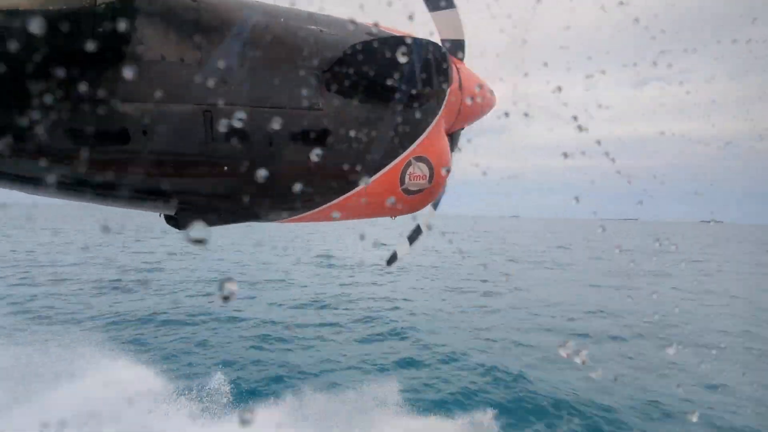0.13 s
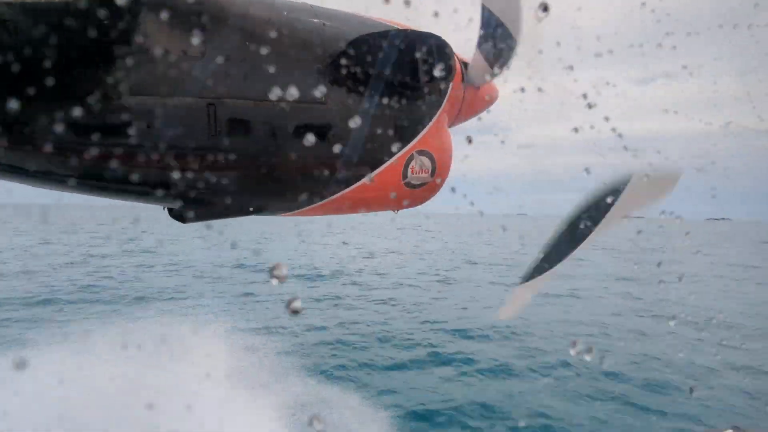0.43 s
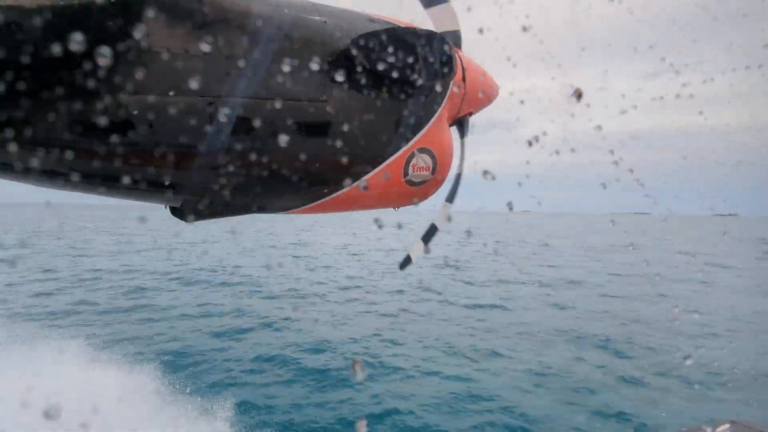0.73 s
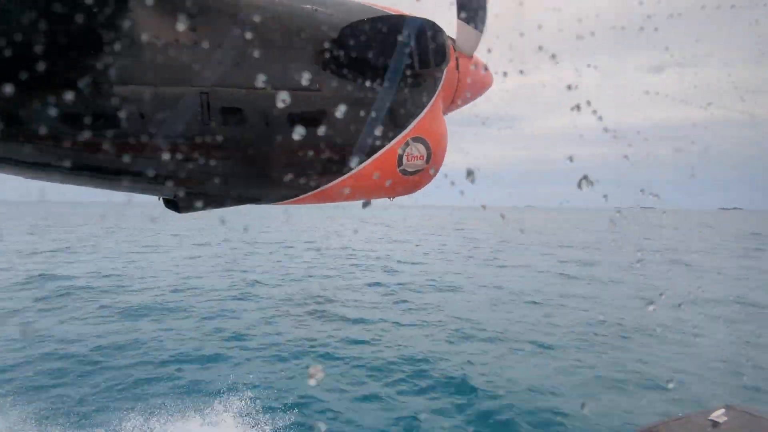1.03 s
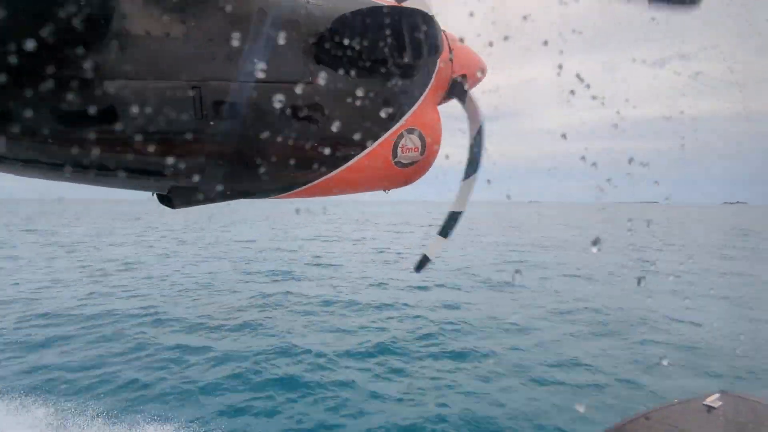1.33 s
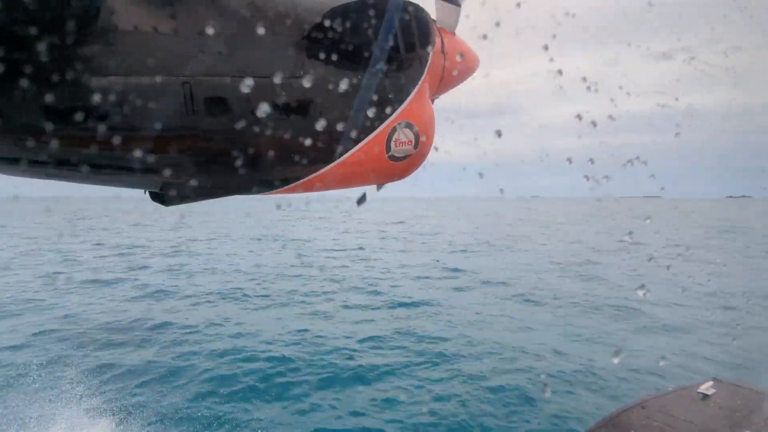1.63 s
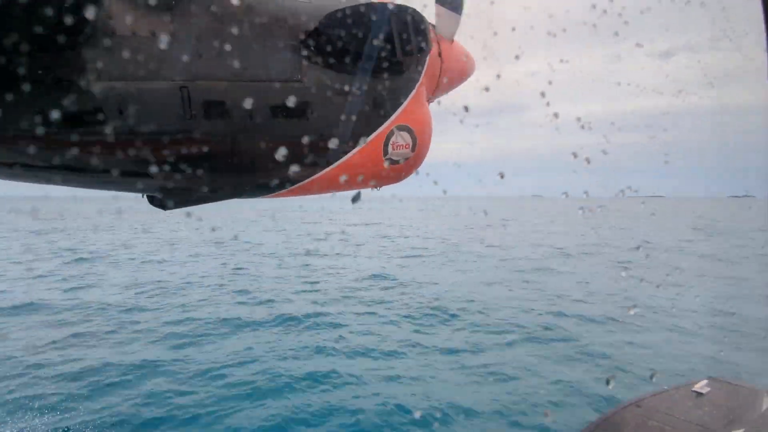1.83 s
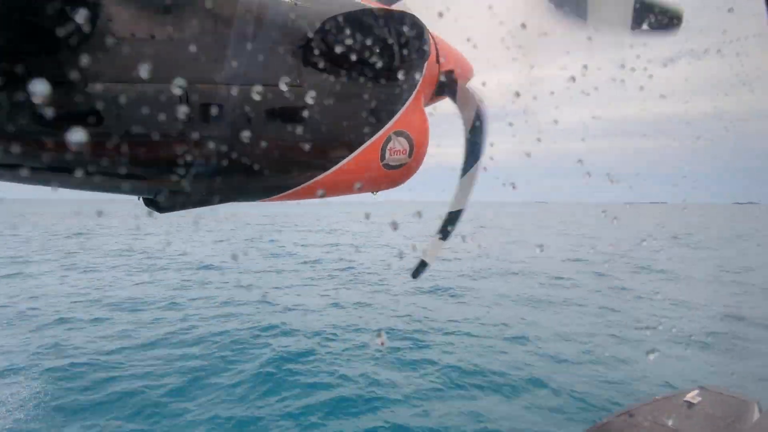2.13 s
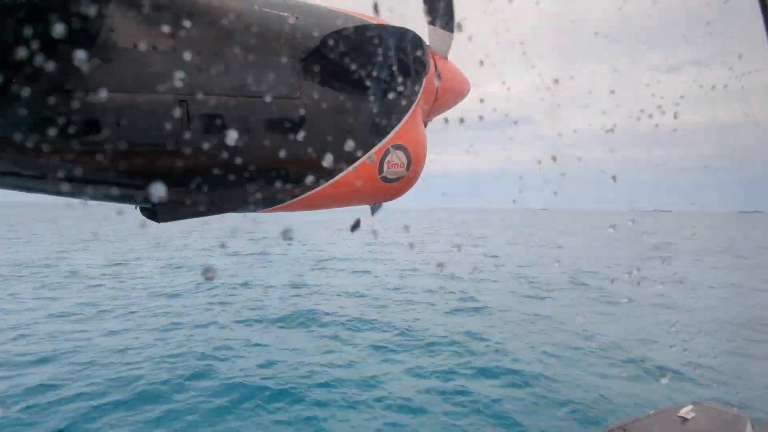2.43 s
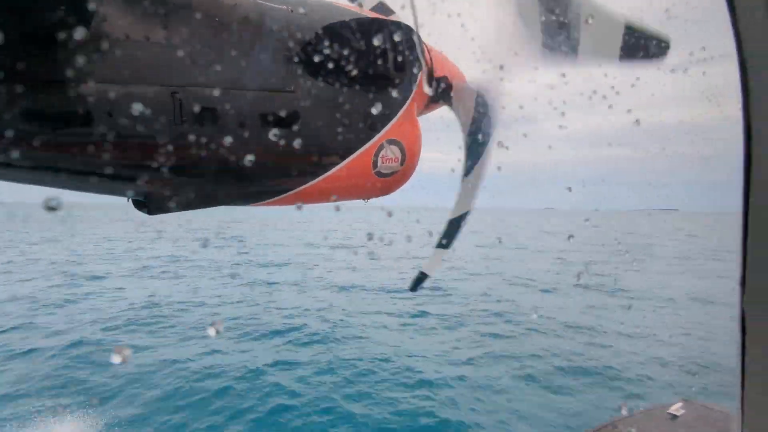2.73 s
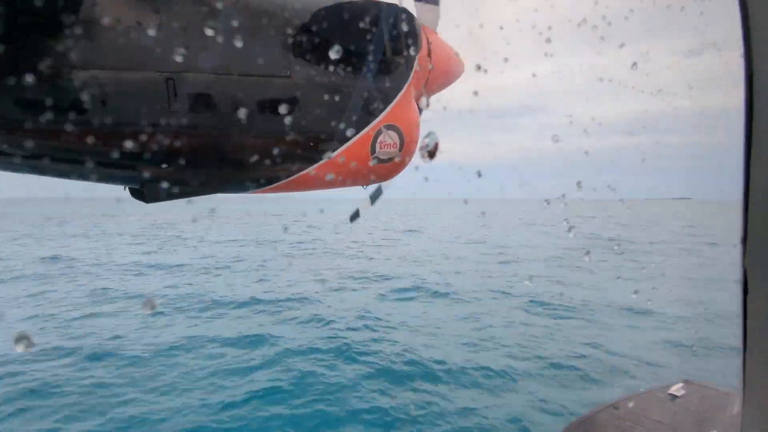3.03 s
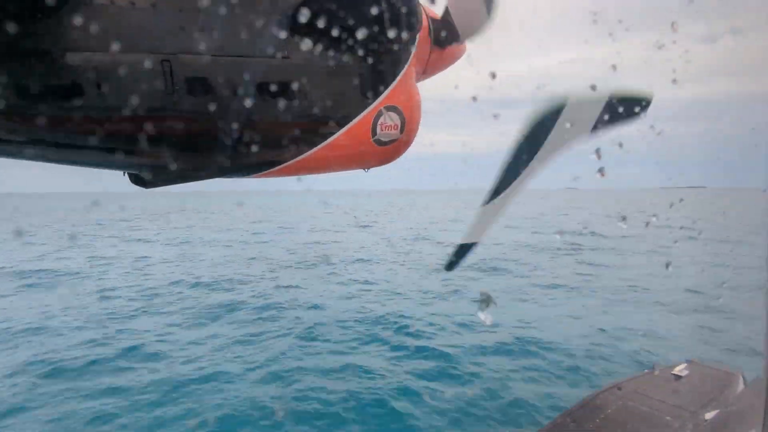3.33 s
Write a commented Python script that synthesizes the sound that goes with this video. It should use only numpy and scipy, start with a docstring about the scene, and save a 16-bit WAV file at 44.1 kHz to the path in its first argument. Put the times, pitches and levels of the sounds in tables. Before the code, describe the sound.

Loud, deep turboprop propeller drone heard inside a small seaplane cabin, steady and throbbing

```python
"""Seaplane cabin at takeoff

Stereo microphones at a window seat of a twin-turboprop seaplane lifting off the water at full power.
The near and far propellers turn at almost the same speed, so each harmonic beats at its own pace.
Noise shaped in frequency gives the rush of slipstream and exhaust through the cabin wall.
Narrow bands of noise give the faint shaft overtones, gear tones and turbine hiss."""
import sys
import numpy as np
from scipy import signal
from scipy.fft import rfft, irfft
from scipy.io import wavfile

SR = 44100
rng = np.random.default_rng(int(sys.argv[2]) if len(sys.argv) > 2 else 0)


def dump_mix(stems):
    """Bounce the given channels to the path in sys.argv[1] as a 16-bit WAV at rate SR."""
    frames = np.atleast_2d(stems).T  # one column per channel
    limited = np.clip(frames, -1, 1)  # hard clip at full scale
    pcm = np.round(limited * 32767).astype(np.int16)
    wavfile.write(sys.argv[1], SR, pcm)


N = 153468
TIME = np.arange(N) / SR
FREQS = np.maximum(np.fft.rfftfreq(N, 1 / SR), 1)


def from_db(db):
    """Decibels to gain."""
    return 10 ** (np.asarray(db) / 20)


def rms_one(x):
    """Scale to unit power."""
    return x / np.sqrt(np.mean(x ** 2) + 1e-20)


def in_time(rows):
    """The columns of a curve at every sample."""
    seconds, *columns = np.transpose(rows)
    return [np.interp(TIME, seconds, column) for column in columns]


def in_frequency(rows):
    """The columns of a spectrum at every frequency, joined along a log frequency axis."""
    hz, *columns = np.transpose(rows)
    return np.array([np.interp(np.log(FREQS), np.log(hz), column) for column in columns])


def apart(difference):
    """Split a left-right difference evenly: half added at left, half taken away at right."""
    return np.array([[.5], [-.5]]) * difference


def drift(corner_hz):
    """Slow random motion with spread 1: noise through two equal low-pass poles."""
    step = 40   # samples between computed points
    pole = np.exp(-2 * np.pi * corner_hz * step / SR)
    noise = rng.standard_normal(N // step + 2002)
    slow = signal.lfilter([1], [1, -2 * pole, pole * pole], noise)[2000:]   # start-up dropped
    return np.interp(np.arange(N) / step, np.arange(len(slow)), rms_one(slow))


# blade-pass rate: (time [s], near propeller [Hz], far propeller [Hz])
BLADE_RATE = [(0.0, 104.673, 104.087), (0.3, 104.761, 104.489), (0.6, 104.796, 104.142),
              (0.9, 104.81, 104.357), (1.2, 104.891, 104.384), (1.5, 104.964, 104.367),
              (1.8, 104.94, 104.407), (2.1, 104.747, 104.5), (2.4, 104.769, 104.479),
              (2.75, 104.881, 104.531), (3.1, 105.086, 104.761), (3.48, 104.823, 104.54)]


def blade_angles():
    """Running phase of the near and far blade pulses [rad], the sum of their rates."""
    return [2 * np.pi * np.cumsum(hz) / SR for hz in in_time(BLADE_RATE)]


# drone in the cabin, before the level curves: (multiple of the blade rate, near level [dB], far level [dB],
# a cancellation at left [s], at right [s], left-right difference [dB], left lead over right [rad])
HARMONICS = [(1.0, -24.68, -18.53, 0.82, 0.98, 0.06, 0.0), (2.0, -16.7, -17.35, 0.77, 0.77, 2.13, 0.0),
             (3.0, -24.6, -21.0, 0.54, 0.53, 2.0, 0.0), (4.0, -22.29, -32.7, 0.2, 0.21, 3.75, 0.0),
             (5.0, -29.78, -39.27, 0.32, 0.41, 6.06, 0.8), (6.0, -46.07, -39.21, 0.45, 0.19, 10.58, 1.6),
             (7.0, -41.31, -52.03, 0.38, 0.19, 6.76, 1.2), (8.0, -46.92, -54.97, 0.1, 0.07, 10.71, -1.1),
             (9.0, -50.92, -60.66, 0.08, 0.36, 4.05, -0.7), (10.0, -51.46, -59.73, 0.28, 0.2, 2.78, 2.0)]
# swell of the fundamental: (time [s], level [dB])
FUNDAMENTAL_LEVEL = [(0, 0), (.2, 1.8), (.7, -1), (1.1, -1.5), (1.7, -.3), (2.15, 1.5), (2.8, -1.3),
                     (3.48, 4)]
# swell of the second harmonic: (time [s], level [dB])
SECOND_LEVEL = [(0.0, -2.72), (0.3, -3.33), (0.6, -2.59), (0.9, 3.56), (1.3, 0.85), (1.7, 1.17),
                (2.1, 0.63), (2.7, 0.12), (3.48, 3.13)]
# swell of the harmonics above it: (time [s], level [dB])
UPPER_LEVEL = [(0.0, 0.35), (0.2, 3.35), (0.55, -1.81), (1.0, 1.88), (1.6, -1.63), (2.1, -0.27),
               (2.6, -3.96), (3.05, -1.29), (3.48, 0.78)]
# the fuselage spreads each suction pulse of a blade: the lag grows with the square of the multiple
SMEAR_RAD = 1.43
WOBBLE_RAD, WOBBLE_HZ = 0.06, 9.4   # turbulence shifts the timing of the blade pulses
FLUTTER_DB_PER_MULTIPLE, FLUTTER_HZ = 0.3018, 11.7   # and shakes their strength, most in high harmonics
WAVER_DB, WAVER_HZ = 0.87, 4.7   # each harmonic wavers a little as a whole


def propellers(near, far):
    """Two sets of blade harmonics that beat as one propeller slips past the other."""
    first_db, = in_time(FUNDAMENTAL_LEVEL)
    second_db, = in_time(SECOND_LEVEL)
    upper_db, = in_time(UPPER_LEVEL)
    wobble = WOBBLE_RAD * drift(WOBBLE_HZ)
    drone = 0
    for k, near_db, far_db, left_s, right_s, pan_db, lead in HARMONICS:
        offset = k * wobble + apart(lead) - SMEAR_RAD * k * k
        # line the far wave up with the near one at the listed moment, where their difference cancels
        slip = np.interp([[left_s], [right_s]], TIME, near - far)
        flutter_db = FLUTTER_DB_PER_MULTIPLE * k
        near_gain = from_db(near_db + flutter_db * drift(FLUTTER_HZ))
        far_gain = from_db(far_db + flutter_db * drift(FLUTTER_HZ))
        near_wave = near_gain * np.cos(k * near + offset)
        far_wave = far_gain * np.cos(k * (far + slip) + offset)
        swell_db = first_db if k == 1 else second_db if k == 2 else upper_db
        gain = from_db(apart(pan_db) + swell_db + WAVER_DB * drift(WAVER_HZ))
        # sqrt(2) turns RMS levels into peaks; the minus makes it a suction pulse
        drone = drone - np.sqrt(2) * gain * (near_wave - far_wave)
    return drone


# slipstream and exhaust through the cabin wall, before the trim and level curve:
# (frequency [Hz], left density [dB per Hz], right density [dB per Hz])
RUSH = [(25.0, -74.6, -73.7), (42.0, -68.2, -68.6), (65.0, -56.9, -57.8), (135.0, -54.9, -56.4),
        (250.0, -54.0, -55.3), (400.0, -58.5, -61.7), (560.0, -60.7, -65.6), (800.0, -64.9, -70.8),
        (1150.0, -64.3, -69.1), (1400.0, -68.6, -69.6), (2100.0, -77.7, -70.2), (2750.0, -79.2, -73.3),
        (3150.0, -82.2, -79.8), (4400.0, -87.8, -79.1), (5400.0, -91.5, -81.6), (6300.0, -86.7, -81.1),
        (7200.0, -86.9, -87.4), (8050.0, -91.9, -92.0), (8900.0, -86.3, -89.1), (10900.0, -85.6, -87.9),
        (12000.0, -85.5, -86.6), (13200.0, -94.0, -94.6), (15400.0, -97.4, -97.7)]
# left-right likeness of the noise: (frequency [Hz], likeness [-1 opposite to 1 identical])
LIKENESS = [(35, -0.4), (70, 0.82), (240, 1), (370, 0.88), (560, 0.29), (830, 0.14), (1200, -0.37),
            (1800, -0.13), (3000, 0.1)]
RUSH_TRIM_DB, RUSH_FLICKER_DB, RUSH_FLICKER_HZ = -0.5, 0.55, 8.0
BLADE_CHOP = 0.05   # share of the rush that pulses with the blades


def rush(blade_angle):
    """Broad noise, mostly alike left and right in the bass; octaves flicker and the blades chop it."""
    mid, side = rfft(rng.standard_normal((2, N)))
    alike = np.clip(in_frequency(LIKENESS), -1, 1)
    # 2.1 rather than 2 widens the stereo image slightly
    stereo = np.sqrt(1 + alike) * mid + np.sqrt(1 - alike) * side * apart(2.1)
    density = from_db(in_frequency(RUSH) + RUSH_TRIM_DB)
    spectrum = stereo * density * np.sqrt(SR) / 2
    octave = np.clip(np.round(np.log2(FREQS)), 6, 13)
    noise = 0
    for k in np.unique(octave):
        band = irfft(spectrum * (octave == k), N)
        noise = noise + band * from_db(RUSH_FLICKER_DB * drift(RUSH_FLICKER_HZ))
    return noise * (1 + BLADE_CHOP * np.cos(blade_angle))


# shaft overtones, gear tones and turbine hiss, before the level curve:
# (frequency [Hz], width at half amplitude [Hz], level [dB], left-right difference [dB])
WHINES = [(69.8, 9, -45, 0), (139.4, 6, -40.5, 1), (244, 8, -44, 1), (1468, 30, -58, 0),
          (1987, 35, -58.5, -5), (2972, 10, -64, -4), (9968, 150, -59, 6), (10010, 600, -53.8, 6)]
WHINE_FLICKER_DB, WHINE_FLICKER_HZ = 2.1, 10


def whines():
    """Unsteady machine tones, each a band of noise narrowed by a resonance-shaped filter."""
    out = 0
    for hz, width_hz, level_db, pan_db in WHINES:
        resonance = 1 / (1 + ((FREQS - hz) / width_hz * 2) ** 2)
        mid, side = rms_one(irfft(rfft(rng.standard_normal((2, N))) * resonance, N))
        alike = np.clip(np.interp(hz, *np.transpose(LIKENESS)), -1, 1)
        tone = np.sqrt((1 + alike) / 2) * mid + np.sqrt((1 - alike) / 2) * side * apart(2)
        flicker_db = WHINE_FLICKER_DB * drift(WHINE_FLICKER_HZ)
        out = out + from_db(level_db + apart(pan_db) + flicker_db) * tone
    return out


# shared swell of the rush and the whines: (time [s], level [dB])
RUSH_LEVEL = [(0.0, 2.62), (0.25, 0.2), (0.6, -1.23), (0.78, 0.8), (0.95, 2.33), (1.3, 0.95), (1.7, -1.04),
              (1.95, 1.21), (2.35, 0.55), (2.6, -1.28), (3.05, -2.58), (3.3, 0.28), (3.48, 1.43)]


def scene():
    """Drone, rush and whines as they reach the window seat."""
    near, far = blade_angles()
    drone = propellers(near, far)
    rush_db, = in_time(RUSH_LEVEL)
    return drone + from_db(rush_db) * (rush(near) + whines())


FADE_S, CUTOFF_HZ = .006, 15680


def record(dry):
    """Fade both ends of the excerpt briefly so the cut makes no click, then cut the top steeply."""
    to_nearest_end = np.minimum(TIME, TIME[-1] - TIME)
    fade = np.sin(np.pi / 2 * np.clip(to_nearest_end / FADE_S, 0, 1)) ** 2
    low_pass = signal.ellip(12, .1, 80, CUTOFF_HZ, fs=SR, output="sos")
    return signal.sosfilt(low_pass, dry * fade)


dry = scene()
out = record(dry)
dump_mix(out)
```